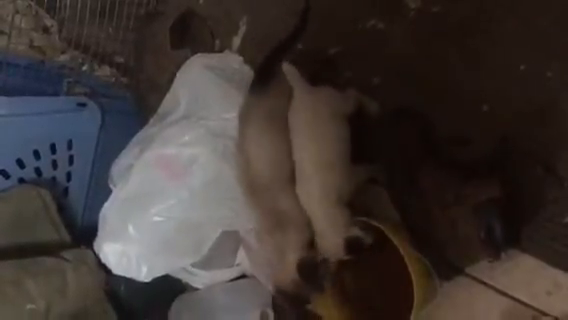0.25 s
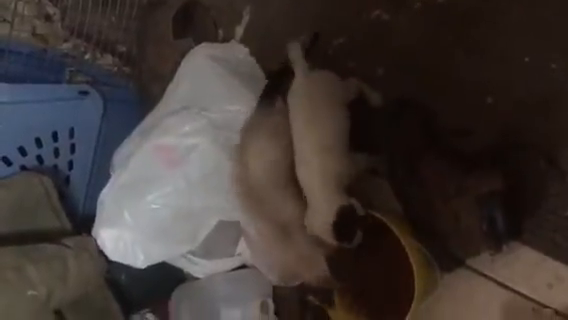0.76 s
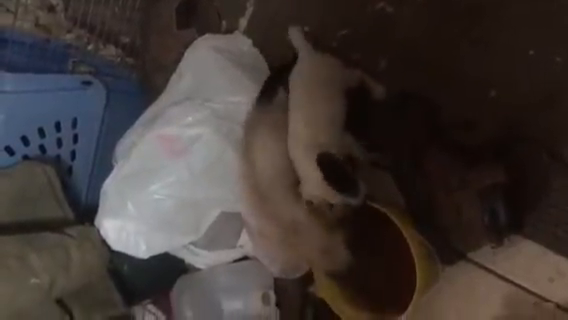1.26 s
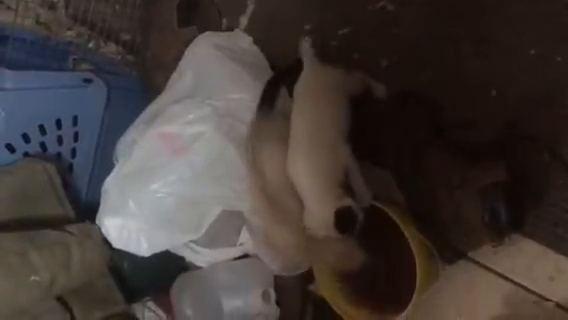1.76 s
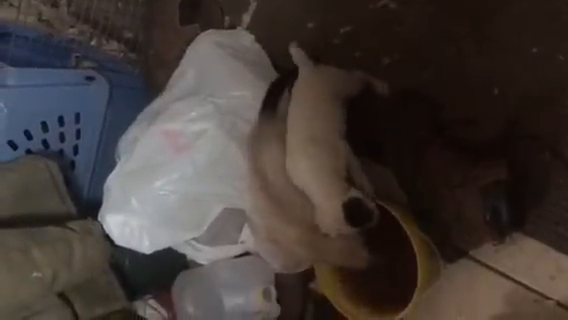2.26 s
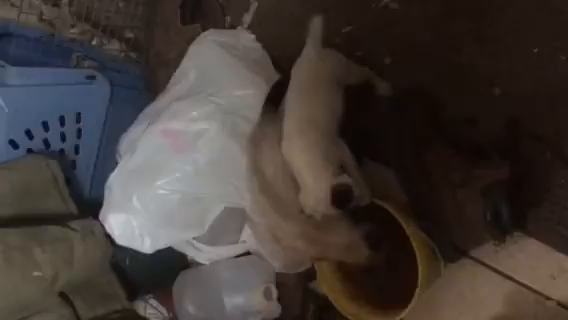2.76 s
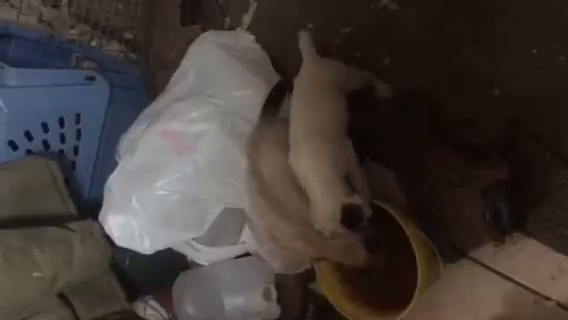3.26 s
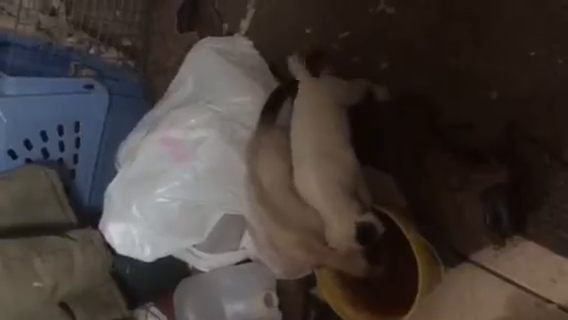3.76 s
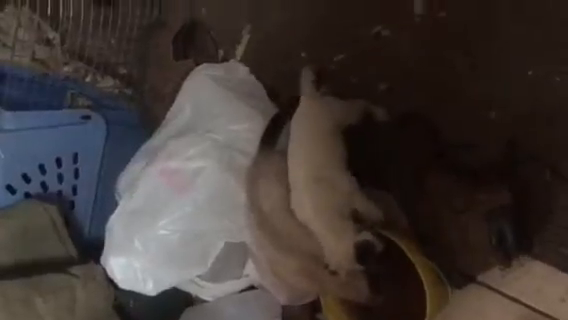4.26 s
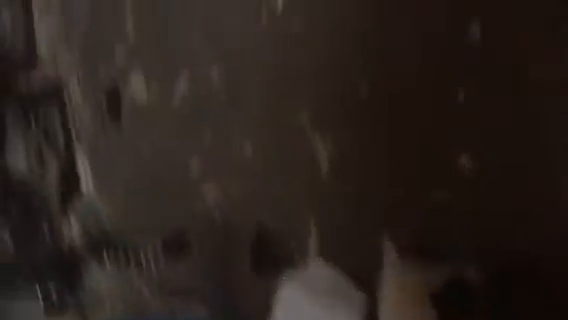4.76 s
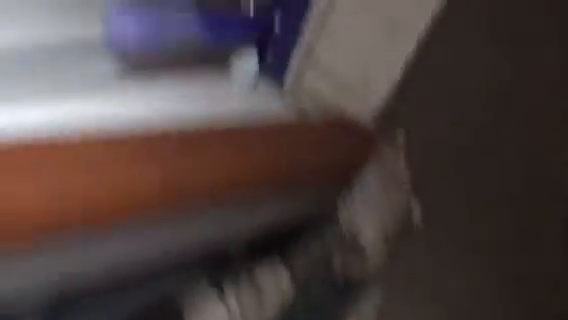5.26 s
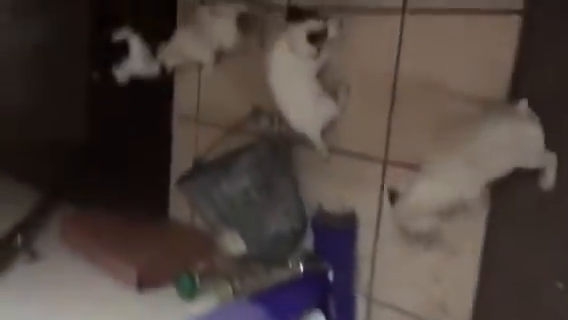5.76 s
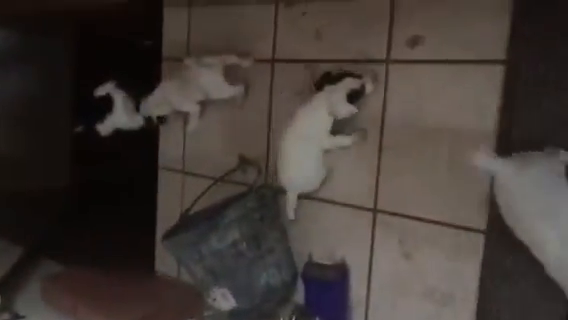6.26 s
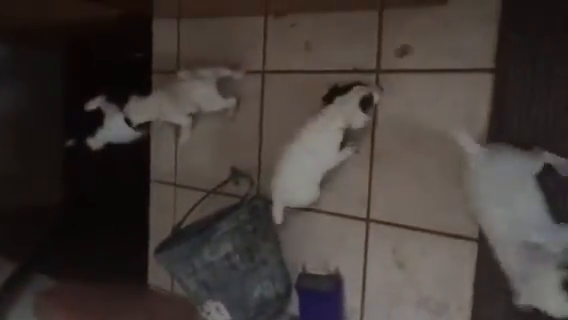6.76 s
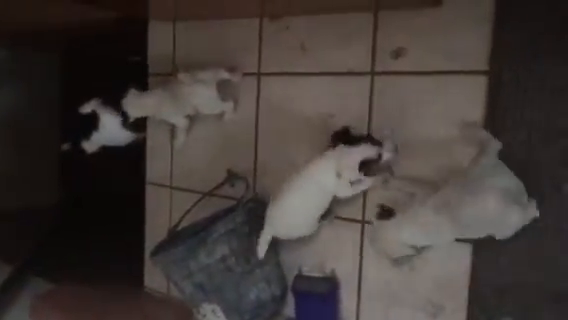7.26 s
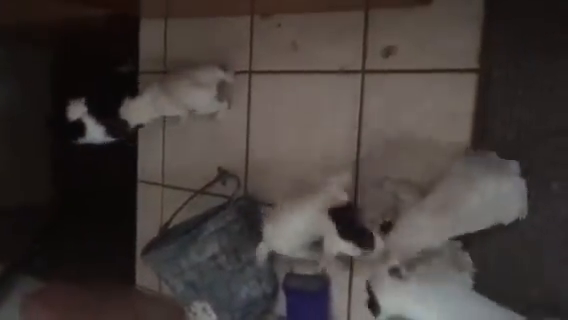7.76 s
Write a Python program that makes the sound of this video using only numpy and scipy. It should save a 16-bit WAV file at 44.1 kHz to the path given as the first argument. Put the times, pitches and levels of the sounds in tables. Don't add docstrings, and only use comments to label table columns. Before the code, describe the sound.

Faint puppy whimpers and paw scuffs over a low indoor rumble, then three loud, sharp, raspy yips from one nearby puppy in a tiled room.

```python
import sys
import numpy as np
from scipy import signal
from scipy.fft import rfft, irfft, next_fast_len
from scipy.io import wavfile
from scipy.ndimage import uniform_filter1d, minimum_filter1d, map_coordinates

SR = 44100
rng = np.random.default_rng(int(sys.argv[2]) if len(sys.argv) > 2 else 0)


def invert_db(level):
    return 10 ** (np.asarray(level, dtype=float) / 20)


def file_out(sig):
    cols = np.atleast_2d(sig).T
    lim = np.clip(cols, -1, 1)
    pcm = np.round(lim * 32767).astype(np.int16)
    wavfile.write(sys.argv[1], SR, pcm)


N = 352976

# t/s, level/dB
HOUSE_STIR = [(0.0, -42.5), (0.36, -55.5), (1.85, -53.5), (2.16, -41), (2.72, -51.5), (3.3, -50),
              (3.43, -40), (3.56, -48), (3.68, -42.5), (4.2, -57.5), (4.4, -49), (5.01, -56), (5.9, -54),
              (6.0, -54), (6.6, -60.5), (6.85, -51.5), (7.57, -55.5), (7.84, -47.5)]
# t/s, level/dB
BEDDING_LEVEL = [(0.0, -72), (1.1, -75.5), (1.34, -73), (1.8, -77), (2.1, -77.5), (2.65, -74), (2.88, -77.5),
                 (3.35, -73), (3.45, -69.5), (3.75, -81.5), (3.93, -67.5), (4.1, -75), (4.25, -71.5),
                 (5.95, -65.5), (6.66, -69.5), (6.95, -60.5), (7.5, -70), (8.0, -70)]
# f/Hz, level/dB
RUMBLE_SPECTRUM = [(15, -47.5), (30, -10.5), (46, -6.5), (59, 1.5), (76, -2), (97, -11), (140, -15),
                   (180, -43), (310, -120)]
# f/Hz, level/dB
SHUFFLE_SPECTRUM = [(71, -40.5), (120, -0.5), (161, -1.5), (355, -17), (495, -29), (700, -32.5), (910, -65),
                    (1540, -120)]
# f/Hz, level/dB
RUSTLE_SPECTRUM = [(290, 1.5), (500, -3.5), (936, -6), (1130, -6.5), (1470, -8.5), (2250, -7), (4890, -14),
                   (5910, -8.5), (7590, -15), (10000, -12.5), (13000, -57), (22000, -120)]
# f/Hz, level/dB
BAG_SPECTRUM = [(5300, -30), (9000, -2.5), (10500, -10.5), (11400, 0), (13900, -1.5), (15800, 1)]
# middle t/s, length/s, level/dB
SWISHES = [(0.43, 0.44, -74), (1.07, 0.24, -67), (1.22, 0.11, -59.5), (4.115, 0.21, -60),
           (4.623, 0.071, -57), (5.19, 0.1, -59), (4.6, .06, -76), (7.14, 0.17, -56.5), (6.29, .15, -54.5),
           (4.8, 0.071, -81), (7.3, 0.063, -67), (7.59, 0.16, -57), (7.74, 0.155, -56), (3.8, 0.033, -59),
           (2.3, 0.04, -66), (2.78, 0.055, -68), (0.806, 0.082, -65), (7.98, 0.091, -51)]
# t/s, peak level/dB, f/Hz, t60/s
BUMPS = [(0.551, -49, 216, 0.29), (3.186, -44, 244.5, 0.16), (3.264, -40.5, 326, 0.21),
         (3.334, -41, 231, .3), (3.521, -50.5, 225, 0.32), (3.672, -39, 236, 0.15),
         (5.636, -51.5, 254, 0.091), (7.975, -44, 299, .2), (.56, -54, 347, 0.18), (.85, -59.5, 348, .15),
         (1.91, -56, 299, 0.22), (2.901, -56, 213, .2), (4.589, -58, 197, 0.29)]
# t/s, peak level/dB, f/Hz, t60/s, body shuffle level/dB
THUMPS = [(0.552, -48, 69, 0.16, -57.5), (1.95, -52, 99.5, 0.22, -53.5), (2.147, -33, 55, 0.16, -78),
          (3.186, -34, 68, 0.078, -50), (3.358, -37.5, 49, 0.19, -54), (3.667, -47, 69, 0.084, -49),
          (3.759, -33.5, 63.6, 0.1, -54.5), (4.288, -49, 66.6, 0.27, -55), (5.629, -46, 94, 0.22, -54),
          (5.971, -40.5, 82, 0.58, -40.5), (7.147, -29, 128.7, 0.069, -39.5),
          (7.29, -40.5, 136.7, 0.19, -48), (7.815, -33, 57.2, 0.18, -45.5)]
# t/s, peak level/dB
NUDGES = [
    (3.253, -33),
    (4.297, -34.5),
]
# f/Hz, level at first nudge/dB, level at second nudge/dB, t60/s
DISH_TONES = [(1040, -1, -2, 0.09), (2000, 6, 8, 0.047), (2620, 0.5, -1, 0.066), (3000, -12, -12, 0.41),
              (4000, -18, -22, 0.12), (4500, -29, -18, 0.68), (7230, -13, -7, 0.18), (8700, -11, -18, 0.13),
              (9250, -12, -12, 0.12), (10150, -11, -20, 0.12), (11100, -4.5, -22, .07),
              (14180, -14, -6, .2)]
# t/s, peak level/dB, brightness/(dB per octave), t60/s
SCUFFS = [(0.498, -51.5, 1, 0.5), (3.22, -47.5, -4, 1), (3.252, -34, -1.5, 0.27), (3.895, -31.5, 4, 0.095),
          (4.279, -34.5, -2, 0.13), (4.296, -32, -1.5, 0.28), (4.878, -39.5, 3, 0.11),
          (5.638, -45, -2, 0.23), (7.105, -37, 6.5, 0.17), (0.84, -48.5, -5.5, 0.19),
          (7.974, -25.5, -13, 0.24), (7.988, -30.5, -8.5, 0.32)]
# f/Hz, level/dB
SCUFF_SPECTRUM = [(120, -75), (200, -7.5), (334, -11.5), (490, -13), (1610, -8.5), (1790, -10), (4990, -18),
                  (14700, -23), (15800, -39)]
# t/s, peak level/dB, centre f/Hz
PADS = [(0.2876, -55.5, 2230), (0.283, -64, 484), (1.365, -61, 800), (5.655, -48, 2190), (5.672, -49, 2170),
        (5.705, -52.5, 2000), (5.89, -50, 2270), (3.222, -67, 1900), (3.29, -48, 2700), (3.33, -55, 2860),
        (3.365, -55, 1200), (4.335, -46, 2600), (4.365, -57, 1530), (.02, -56, 1490), (0.541, -58, 1020),
        (1.492, -53, 2000), (1.6494, -63, 2220), (2.1603, -62, 1040), (2.4655, -53.5, 1900),
        (2.4932, -56, 3180), (2.5994, -57.5, 1540), (2.74, -61, 3260), (3.402, -76, 1010),
        (3.462, -56.5, 2290), (3.652, -52.5, 2200), (5.6329, -50.5, 1690), (5.9673, -46.5, 1366),
        (7.819, -49, 1260)]
# t/s, peak level/dB, centre f/Hz
HARD_TICKS = [(0.19, -43, 13000), (0.7043, -48, 11900), (0.7344, -54, 11900), (1.3598, -47, 12900),
              (2.54, -53, 7400), (2.672, -42, 11500), (3.0749, -50, 5830), (3.7198, -53, 3400),
              (3.7205, -50, 10100), (3.7545, -47, 13400), (3.8397, -50, 8700), (3.8945, -39.5, 4500),
              (3.8962, -53, 3000), (3.9078, -39, 6200), (4.796, -39.5, 11500), (4.8778, -38, 8450),
              (4.9825, -46, 6740), (7.2868, -41, 990), (7.5098, -48, 12230), (3.668, -46, 11000),
              (3.616, -58, 12200), (7.3962, -55, 2510), (7.418, -50, 2460), (7.44, -46, 3180),
              (5.158, -45, 5100), (2.364, -65, 5900),
              (0.1521, -60, 11900), (0.2774, -50, 14600), (0.286, -42, 15100), (0.3566, -48, 14800),
          (0.4399, -52, 13500), (0.4913, -51, 12500), (0.54, -52, 6360), (0.612, -54, 14500),
          (1.8587, -53, 14000), (2.0667, -56, 12300), (2.1605, -65, 13300), (2.4934, -46.5, 6600),
          (2.6045, -51, 13600), (2.8863, -54, 11200), (2.9886, -64, 14000), (3.109, -53, 9210),
          (3.1767, -60, 14000), (3.2001, -49, 15200), (3.3314, -60, 10200), (3.3754, -60, 8970),
          (3.4017, -49, 9430), (3.4617, -42, 12300), (3.6535, -52.5, 12500), (3.659, -45, 8660),
          (3.649, -55, 7000), (3.749, -56, 14000), (3.761, -59, 8500), (6.719, -52.5, 12000),
          (6.75, -58.5, 8000), (7.808, -44.5, 4600), (7.782, -49, 2700), (5.899, -46.5, 3500),
          (4.5141, -56, 8760), (4.787, -60, 12400), (4.8924, -49, 8900), (4.9477, -60, 11400),
          (5.0704, -56, 11500), (5.6328, -40, 13000), (4.868, -49, 3000), (4.785, -54, 2500),
          (5.8994, -66, 5050), (6.6754, -64, 5860), (7.64, -44, 5500), (7.8189, -48, 7500),
          (7.9083, -53, 15400)]

# t/s, pitch f/Hz, level/dB
WHINES = [
    [(4.012, 1568, -59), (4.04, 1690, -50), (4.066, 1827, -46), (4.12, 1838, -42.5), (4.22, 1838, -44.5),
     (4.27, 1828, -52.5)],
    [(1.116, 1375, -83), (1.123, 1375, -43), (1.14, 1484, -45.5), (1.155, 1518, -41.5), (1.185, 1505, -60)],
    [(6.21, 1940, -64), (6.235, 1870, -54.5), (6.265, 1850, -60), (6.3, 1800, -48), (6.315, 1860, -64),
     (6.335, 1840, -57), (6.355, 1900, -65)],
]
# t/s, pitch f/Hz, level/dB
BREATHY_CRIES = [
    [(1.709, 1244, -71), (1.726, 1120, -50.5), (1.742, 1035, -50.5), (1.765, 942, -50), (1.78, 985, -77)],
    [(5.384, 1320, -64), (5.393, 1263, -48.5), (5.406, 1210, -48), (5.425, 1160, -56)],
    [(7.551, 931, -61), (7.57, 990, -49), (7.6, 1179, -49.5), (7.618, 1107, -68.5)],
    [(7.692, 1375, -62), (7.7, 1338, -51), (7.728, 1178, -41.5), (7.745, 1076, -63)],
]
# t/s, length/s, first f/Hz, last f/Hz, level/dB
MUFFLED_CRIES = [
    (3.958, 0.042, 1464, 1290, -56),
    (5.14, 0.059, 1210, 1223, -54.5),
    (5.672, 0.037, 946, 788, -53),
    (6.0, 0.069, 2760, 3280, -54),
    (7.012, 0.034, 698, 693, -49.5),
    (7.06, 0.036, 740, 681, -56),
]
# t/s, pitch f/Hz, level/dB
HOARSE_CRIES = [
    [(4.577, 1850, -58), (4.583, 1808, -44), (4.6, 1686, -44.5), (4.645, 1645, -46), (4.69, 1452, -54.5),
     (4.71, 1420, -64)],
    [(5.776, 1660, -63), (5.782, 1605, -46), (5.82, 1566, -47), (5.845, 1483, -52), (5.865, 1430, -66)],
]
# brightness/(dB per octave), tongue resonance f/Hz, its lift/dB
FAINT_COLOURS = [(-1.5, 5500, 1.5), (1, 6480, 23), (5.5, 3650, 10), (2.5, 5240, 8.5), (3.5, 7700, 7),
                 (3, 5440, 5.5), (4.5, 7560, 9.5), (-14, 3000, 1.5), (-16, 3000, 1.5), (-16, 3000, 1.5),
                 (-27, 4100, 3.5), (-16, 3000, 1.5), (-16, 3000, 1.5), (4, 4200, 1.5), (4, 4800, 10)]
# f/Hz, level/dB
NOSE = [(600, 0.5), (1900, 1), (2450, -18.5), (3300, -15.5), (5000, -19.5), (7500, -19), (10500, -21.5),
        (15000, -24)]
# f/Hz, level/dB
WHEEZE = [(600, 5.5), (1300, 8.5), (2200, -9), (3200, -17), (4600, -13.5), (7000, -17), (9500, -16),
          (11000, -24), (15000, -21)]
# f/Hz, level/dB
THROAT = [(600, -30.5), (1400, -1), (1900, -2.5), (3300, -36.5), (5000, -27), (7000, -27), (8500, -27),
          (10500, -38), (15000, -24)]

# t/s, pitch f/Hz, level/dB, tongue resonance f/Hz, its lift/dB
YIPS = [
    [(6.038, 1223, -36.5, 3670, 7), (6.053, 1296, -26.5, 3800, -5), (6.066, 1349, -21.5, 4000, -9),
     (6.071, 1616, -12.5, 3350, 9), (6.09, 1432, -9, 4150, 7), (6.115, 1362, -13.5, 4000, 7.5),
     (6.148, 1323, -8.5, 2670, -9.5), (6.158, 1325, -27, 2660, -4.5), (6.176, 1274, -25.5, 2650, -7.5)],
    [(6.358, 1228, -44.5, 6300, 31), (6.376, 1249, -30, 6490, 6), (6.394, 1221, -19.5, 3000, -5),
     (6.42, 1341, -14, 2830, 17.5), (6.436, 1306, -9.5, 4070, 10.5), (6.458, 1342, -10, 4000, 4.5),
     (6.482, 1345, -11.5, 4000, -0.5), (6.505, 1186, -18.5, 3600, 4.5), (6.52, 1130, -34.5, 5900, 10.5)],
    [(6.8035, 1105, -37.5, 3220, 11), (6.809, 1080, -31.5, 3210, 1), (6.829, 1150, -25.5, 3450, -3.5),
     (6.834, 1540, -17.5, 4000, 5), (6.85, 1292, -20.5, 3900, 4.5), (6.864, 1301, -20, 2650, 13),
     (6.886, 1418, -19, 2900, 6), (6.905, 1451, -26, 3600, 6), (6.93, 1415, -30, 3630, 0.5)],
]
# f/Hz, level/dB
MOUTHS = [
    [(600, -45.5), (1000, -17), (1350, 1.5), (2000, -10.5), (2700, -5), (4000, -13.5), (5200, -22.5),
     (6800, -28), (7700, -38.5), (10500, -44.5), (13000, -51.5), (15800, -57)],
    [(600, -43.5), (1000, -13), (1350, 5), (2000, -12), (2750, -17), (3950, -17.5), (5200, -29.5),
     (6800, -30.5), (7700, -42), (11200, -46.5), (13000, -57.5), (15800, -60)],
    [(600, -59.5), (1000, -5.5), (1350, 4), (2000, -10.5), (2700, -14.5), (3550, -4.5), (5200, -20),
     (6800, -22.5), (7700, -30.5), (10500, -37), (13000, -38), (15800, -50.5)],
]
# break t/s, settle t/s, scream roughness/(0-1), settled roughness/(0-1)
STAGES = [
    (6.068, 6.113, .48, .25),
    (6.397, 6.434, .55, .13),
    (6.831, 6.858, .52, .24),
]
# half-pitch lines in the scream/dB, when settled/dB,
# brightness before the break, in the scream and when settled/(dB per octave)
YIP_COLOURS = [
    (-3, -8.5, 2.9, 0.39, -0.32),
    (-3.5, -5, 2, 3.1, -0.42),
    (9, 0.5, -0.6, 0.8, 0.95),
]

# f/Hz, t60/s
ROOM_DECAY = [(300, 0.22), (1300, 0.39), (3500, 0.29), (7000, 0.28), (14000, 0.3)]
# f/Hz, level/dB
PORT_SPECTRUM = [(11500, -61), (13000, -22), (14800, -2), (15800, -4.5)]

CLEAN_ROUGH, CLEAN_HALF_DB = 0.09, -36
TURN_S = 0.005
TONGUE_WIDTH_HZ, RASP_DB = 410, -5
DULLS = 1.3


def unit(x):
    return x / np.sqrt(np.mean(x ** 2) + 1e-20)


def along(points, hz):
    f, v = np.transpose(points)
    return np.interp(np.log(hz + 1), np.log(f + 1), v)


def chance(size):
    return rng.standard_normal(-(-size // 4096) * 4096)[:size]


def wobble(rate, size):
    knots = chance(int(size * rate / SR) + 4)
    return map_coordinates(knots, [np.arange(size) * rate / SR])


def coloured(x, spectrum):
    m = next_fast_len(len(x) + 2048)
    gain = invert_db(along(spectrum, np.fft.rfftfreq(m, 1 / SR)))
    return irfft(rfft(x, m) * gain, m)[:len(x)]


def noise(spectrum, size):
    return unit(coloured(chance(size), spectrum))


def add(track, s, sound):
    part = track[round(s * SR):][:len(sound)]
    part += sound[:len(part)]


def room(x, delay, slow=1):
    hz, t, z = signal.stft(rng.standard_normal(SR), SR, nperseg=256)
    t60 = slow * along(ROOM_DECAY, hz)[:, None]
    tail = signal.istft(z * invert_db(-60 * t / t60), SR, nperseg=256)[1]
    late = np.pad(x, (round(delay * SR), 0))
    return signal.fftconvolve(late, tail / np.linalg.norm(tail))[:N]


def background():
    t = np.arange(N) / SR
    house_db = np.interp(t, *np.transpose(HOUSE_STIR))
    bedding_db = np.interp(t, *np.transpose(BEDDING_LEVEL))
    rumble = invert_db(house_db - 4.5 + 1.7 * wobble(7.5, N)) * noise(RUMBLE_SPECTRUM, N)
    shuffle_db = -66.5 + 0.45 * (house_db + 53.0) + 1.6 * wobble(12.0, N) + 0.65 * wobble(11.0, N)
    shuffle = invert_db(shuffle_db) * noise(SHUFFLE_SPECTRUM, N)
    stir = np.tanh(wobble(28, N))
    rustle = invert_db(bedding_db + 3.5 + 0.99 * stir + 1.7 * wobble(110, N)) * noise(RUSTLE_SPECTRUM, N)
    swish = sum(invert_db(db) * np.exp(-(2 * (t - s) / length) ** 2) for s, length, db in SWISHES)
    crackle = invert_db(1.5 * stir + 0.8 * wobble(90, N))
    bag = (invert_db(bedding_db + 2.5) + swish) * crackle * noise(BAG_SPECTRUM, N)
    return rumble + shuffle + rustle + bag


def tub():
    out, t = np.zeros(N), np.arange(SR // 2) / SR
    for s, db, hz, t60 in BUMPS:
        turn = 2 * np.pi * np.cumsum(hz * (1 + 0.025 * wobble(46.5, len(t)))) / SR
        add(out, s, invert_db(db - 60 * t / t60) * (1 - np.exp(-t / 0.0054)) * np.sin(turn))
    return out


def thumps():
    out, t = np.zeros(N), np.arange(SR // 2) / SR
    for s, db, hz, t60, body_db in THUMPS:
        turn = 2 * np.pi * np.cumsum(hz * (1 + 0.19 * wobble(48, len(t)))) / SR
        add(out, s, invert_db(db - 60 * t / t60) * (1 - np.exp(-t / 0.0017)) * np.sin(turn))
        body = invert_db(body_db + 2.5 - 60 * t / 0.44) * (1 - np.exp(-t / 0.014))
        add(out, s, body * noise(SHUFFLE_SPECTRUM, len(t)))
    return out


def dish():
    out, t = np.zeros(N), np.arange(SR // 2) / SR
    for k, (s, db) in enumerate(NUDGES):
        ring = sum(invert_db(levels[k] - 60 * t / t60) * np.sin(2 * np.pi * hz * t)
                   for hz, *levels, t60 in DISH_TONES)
        add(out, s, invert_db(db - 14.5 + 1.9 * wobble(64, len(t))) * (1 - np.exp(-t / 0.0011)) * ring)
    return out


def scuffs():
    out, t = np.zeros(N), np.arange(SR // 2) / SR
    for s, db, bright, t60 in SCUFFS:
        colour = [(hz, level + bright * np.log2(max(hz, 400) / 1500)) for hz, level in SCUFF_SPECTRUM]
        grit = invert_db(7 * np.tanh(wobble(400, len(t))))
        swell = invert_db(db - 12.5 - 60 * t / t60) * (1 - np.exp(-t / 0.0021))
        add(out, s, swell * unit(grit * noise(colour, len(t))))
    return out


def ticks(contacts, t60, rise):
    out, t = np.zeros(N), np.arange(SR // 8) / SR
    for s, db, hz in contacts:
        crack = rng.standard_normal(len(t)) * invert_db(-60 * t / (t60 + 22 / hz)) * (1 - np.exp(-t / rise))
        crack = coloured(crack, [(hz / 5, -26), (hz * 0.7, -6), (hz, 0),
                                 (hz * 1.5, -8), (hz * 4, -22), (hz * 9, -32)])
        add(out, s, invert_db(db) * crack / np.abs(crack).max())
    return out


def call(track, rows, chaos, mouth, jitter, shimmer, flutter_db, breath_db):
    s, *cols = np.transpose(rows)
    t = np.arange(s[0], s[-1], 1 / SR)
    hz, db, half_db, bright, tongue_hz, lift_db = [np.interp(t, s, c) for c in cols]
    rough = np.interp(t, *np.transpose(chaos))
    shaken = hz * (1 + jitter * rough * wobble(500, len(t)) + 0.0069 * wobble(55.0, len(t)))
    phase = np.pi * np.cumsum(shaken) / SR
    k = np.arange(1, 30)[:, None]
    flutter = flutter_db * np.array([wobble(60.9, len(t)) for _ in k]) * (k != 2)
    lift = lift_db * np.exp(-((k * hz / 2 - tongue_hz) / TONGUE_WIDTH_HZ) ** 2)
    level_db = bright * np.log2(np.maximum(k / 2, 1)) + half_db * (k % 2) + flutter + lift
    tone = np.sum(invert_db(level_db) * (k * hz < 33000) * np.sin(k * phase + k * k), 0)
    tone *= 1 + np.tanh(shimmer * rough * wobble(800, len(t)))
    lowest = hz.min()
    air = noise([(0.55 * lowest, -40), (lowest, -10), (2.5 * lowest, 0)], len(t))
    puffs = invert_db(breath_db) * air * (1 + np.sin(2 * phase))
    tongue = wobble(700, len(t)) * np.sin(2 * np.pi * np.cumsum(tongue_hz) / SR)
    rasp = (invert_db(lift_db) - 1) * invert_db(RASP_DB) * tongue
    edge = np.clip(np.minimum((t - s[0]) / 0.002, (s[-1] - t) / 0.008), 0, 1)
    source = np.sqrt(2 - rough) * tone + rough * (puffs + rasp)
    folds = edge * invert_db(db - along(mouth, hz)) * source
    add(track, s[0], coloured(folds, mouth))


def arc(start, length, first_hz, last_hz, db):
    s = np.array([0, 0.005, length - 0.016, length])
    pitch = first_hz + (last_hz - first_hz) * s / length
    return list(zip(start + s, pitch, db + np.array([-20, 0, 1.5, -20])))


def whimpers():
    out = np.zeros(N)
    muffled = [arc(*row) for row in MUFFLED_CRIES]
    kinds = [(WHINES[:1], 0.07, NOSE), (WHINES[1:2], 0.2, NOSE), (WHINES[2:], 0.18, NOSE),
             (BREATHY_CRIES, 0.22, WHEEZE), (muffled, 0.17, NOSE), (HOARSE_CRIES, 0.2, THROAT)]
    colours = iter(FAINT_COLOURS)
    for cries, rough, mouth in kinds:
        for cry, (bright, *tongue) in zip(cries, colours):
            first, last = cry[0][0], cry[-1][0]
            rows = [(s, hz, db - 3.0, -60, bright + DULLS * (0.5 - (s - first) / (last - first)), *tongue)
                    for s, hz, db in cry]
            call(out, rows, [(0, rough)], mouth, jitter=0.1, shimmer=0.6, flutter_db=3.5, breath_db=12)
    return out


def yips():
    out = np.zeros(N)
    for yip, stages, colour, mouth in zip(YIPS, STAGES, YIP_COLOURS, MOUTHS):
        snap, settle, scream, calm = stages
        half_db, half_late_db, early, loud, late = colour
        turns = [snap - TURN_S, snap + TURN_S, settle - TURN_S, settle + TURN_S]

        def stage(s, clean, screamed, settled):
            return np.interp(s, turns, [clean, screamed, screamed, settled])

        rows = [(s, hz, db, stage(s, CLEAN_HALF_DB, half_db, half_late_db), stage(s, early, loud, late), *tongue)
                for s, hz, db, *tongue in yip]
        chaos = list(zip(turns, [CLEAN_ROUGH, scream, scream, calm]))
        call(out, rows, chaos, mouth, jitter=0.085, shimmer=0.8, flutter_db=4.5, breath_db=11)
    return invert_db(1.5) * out


def scene():
    loud, faint = yips(), whimpers()
    paws = ticks(HARD_TICKS, t60=0.0042, rise=0.0001) + ticks(PADS, t60=0.055, rise=0.0032)
    paws = paws + scuffs() + dish()
    sway = 0.8 * wobble(14, N)
    near = np.cos(sway) * room(loud, delay=0.004) + np.sin(sway) * room(loud, delay=0.005)
    wet = invert_db(-9.0) * near
    wet = wet + invert_db(-6.0) * room(faint, delay=0.003)
    wet = wet + invert_db(-6.0) * room(paws, delay=0.0066)
    wet = wet + invert_db(-27) * room(loud, delay=0.029, slow=2.6)
    wet = wet + invert_db(-26) * room(loud, delay=0.036, slow=0.23)
    return (loud + faint + paws + wet + thumps() + tub() + background())[None]


def low_pass(x):
    return signal.sosfilt(signal.butter(12, 16450, fs=SR, output="sos"), x)


def record(dry):
    x = signal.sosfilt(signal.butter(4, 42, "high", fs=SR, output="sos"), dry[0])
    power = np.abs(uniform_filter1d(x * x, size=2200, origin=700))
    x = x + invert_db(-29.0) * power ** 0.46 * noise(PORT_SPECTRUM, N)
    needed = np.minimum(1, 0.7 / (np.abs(x) + 1e-9))
    x = x * uniform_filter1d(minimum_filter1d(needed, size=261), size=131)
    x = coloured(x, [(15790, 0), (15830, -80)])[None]
    return low_pass(x)


dry = scene()
out = record(dry)
file_out(out)
```